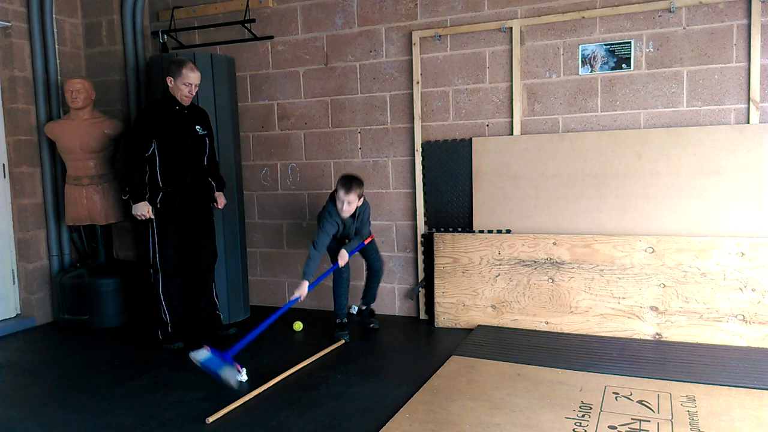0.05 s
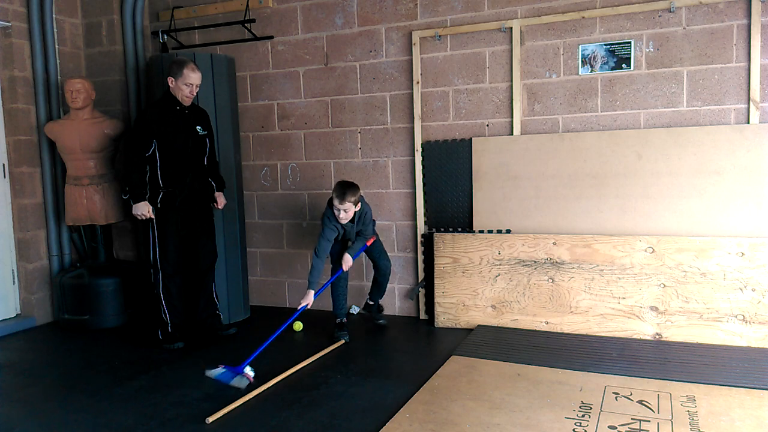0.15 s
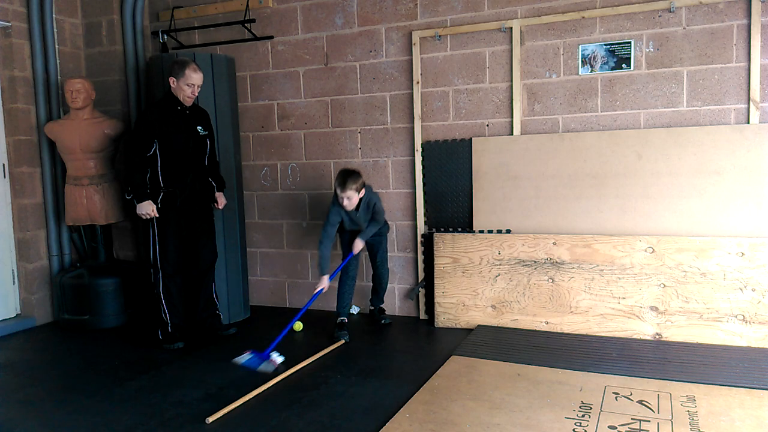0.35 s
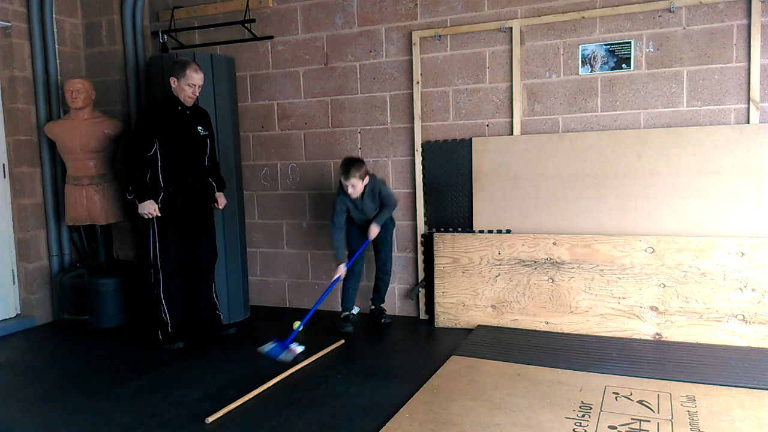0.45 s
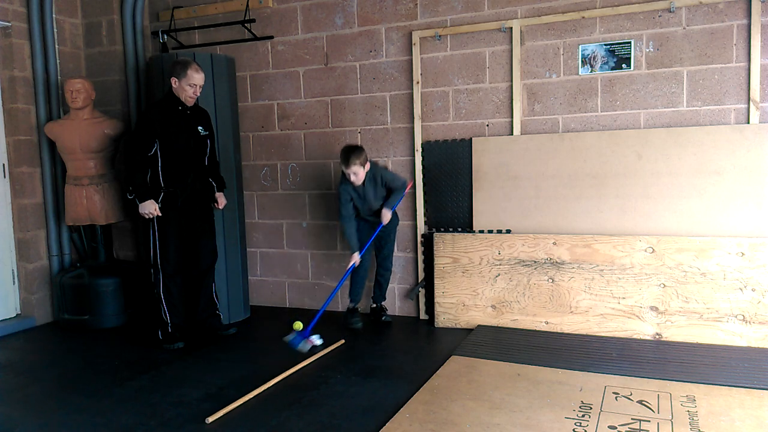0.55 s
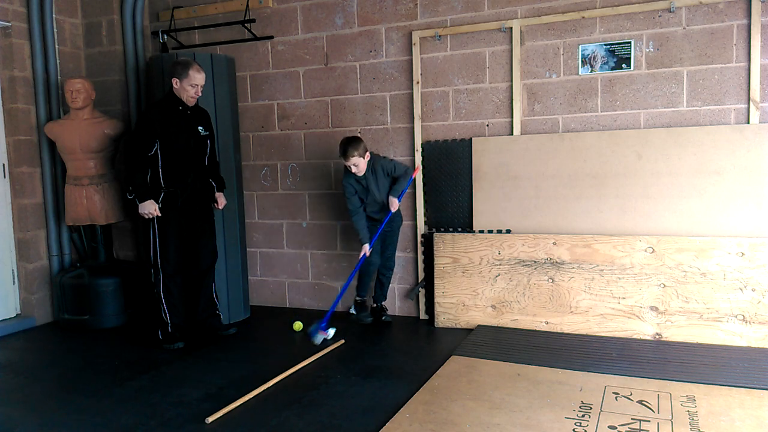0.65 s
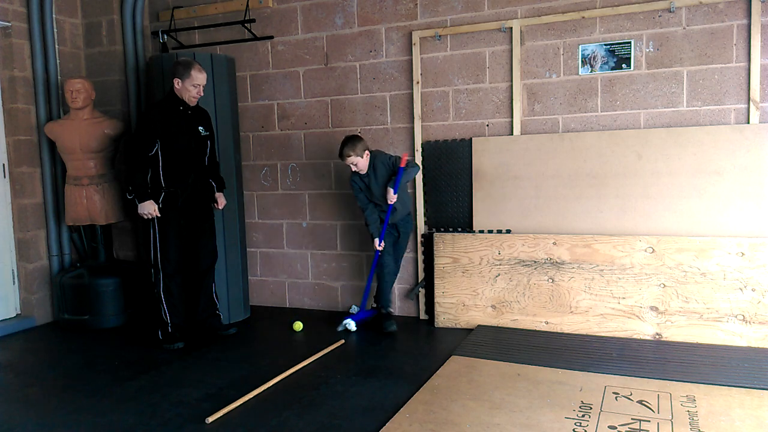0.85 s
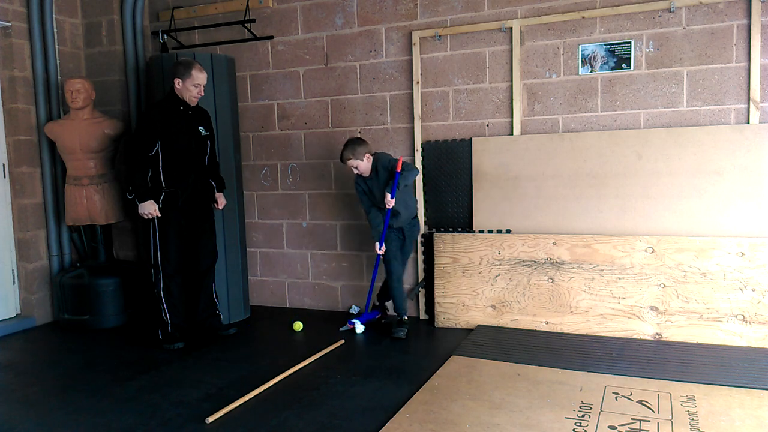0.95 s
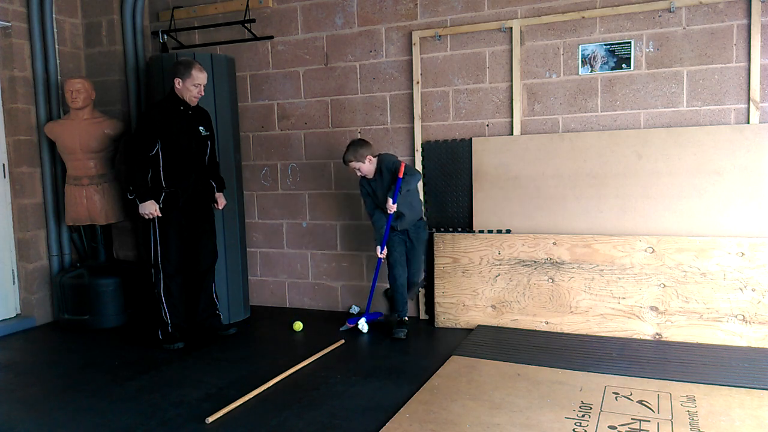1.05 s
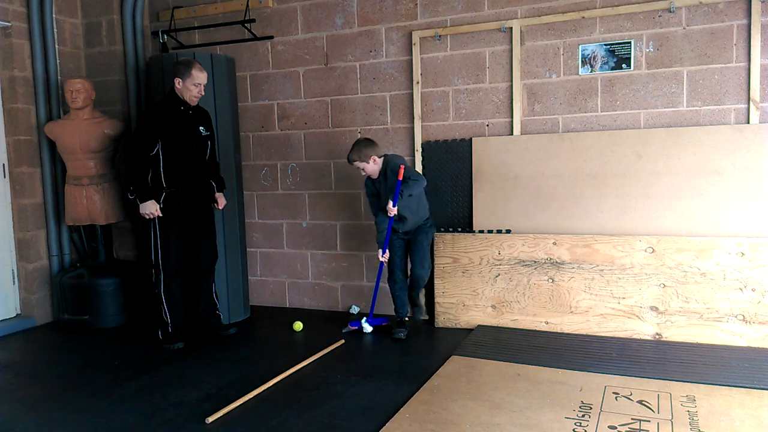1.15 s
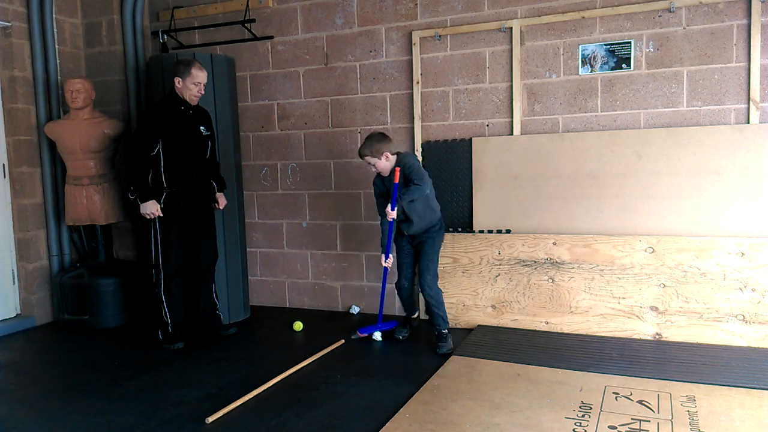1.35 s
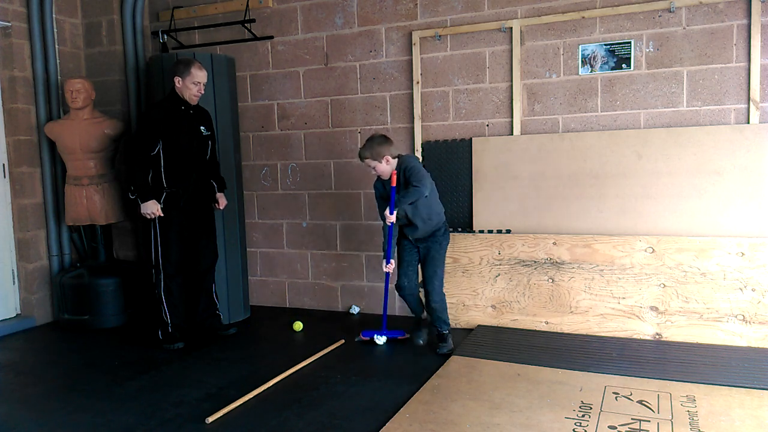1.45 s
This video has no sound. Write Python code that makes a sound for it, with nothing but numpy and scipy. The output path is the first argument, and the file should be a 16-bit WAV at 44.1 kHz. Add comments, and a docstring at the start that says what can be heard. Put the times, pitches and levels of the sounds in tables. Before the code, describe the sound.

A plastic broom clacks down twice, then its bristles scuff and swish over a rubber floor

```python
"""Sweeping a gym floor

A plastic broom lands on a rubber floor with a double clack: short noise bursts plus ringing tones.
Its bristles drag, scuff and swish (thousands of tiny random clicks) and push a scratchy scrap of paper.
Shoes thud softly and small ticks sound (short noise bursts); still air and a low rumble lie beneath.
The small block-walled room answers with one echo, a short fading tail and low ringing.
"""
import sys
import numpy as np
from scipy import signal
from scipy.fft import rfft, irfft, next_fast_len
from scipy.io import wavfile
from scipy.ndimage import uniform_filter1d

SR = 44100
rng = np.random.default_rng(int(sys.argv[2]) if len(sys.argv) > 2 else 0)


def put_to_file(sound):
    """Save the sound as 16-bit audio at rate SR, in the file named by the first command-line argument."""
    columns = np.atleast_2d(sound).T  # one column per channel
    safe = np.clip(columns, -1, 1)
    whole_steps = np.round(safe * 32767)
    wavfile.write(sys.argv[1], SR, whole_steps.astype(np.int16))


N = 66150  # samples: 1.5 s

# In the tables, t60 is the time [s] a sound takes to fade by 60 dB.

# the broom head lands, one end and then flat: (time [s], level [dB], bass [dB])
CLACKS = [(0.2057, -26, -4.5), (0.2364, -17.5, -0.5)]
# tones of the head and handle: (frequency [Hz], relative level [dB], t60 [s])
HEAD_MODES = [(420, 3, .18), (455, 0, .17), (531, -3, .13), (589, 2, .17), (714, -2, .13), (775, -1, .19),
              (932, -3, .22), (1108, -6, .2), (1161, -8, .12), (1335, -1, .16), (1433, -2, .19),
              (1466, -4, .16), (1583, -8, .15), (1637, -5, .18)]
# tone balance of the plastic clatter: (frequency [Hz], level [dB])
CLACK_COLOUR = [(100, -60), (190, -5), (300, 3), (600, 0.5), (1000, -3.5), (1500, -6), (1800, -0.5),
                (2050, -12.5), (3000, -9), (5200, -11.5), (6100, -21.5), (10500, -30), (15000, -54)]
# low room tones woken by clacks and steps: (frequency [Hz], relative level [dB], t60 [s])
BOOM_MODES = [(283, -1, .24), (312, -5, .2), (352, 1, .22), (421, 2, .2)]
CLACK_RISE_S, CLACK_T60_S = .0003, .057
RING_RISE_S, BOOM_RISE_S = .001, 0.0027
RING_DB, CLACK_BOOM_DB, CLACK_ROOM_DB = -13, -20, -13.5  # mix against the clatter
HEAD_LOW_HZ = 215  # the light head radiates no deep bass


def broom_head():
    """Each landing is a short plastic clatter that rings the head and handle and wakes the room."""
    out = np.zeros(N)
    for s, db, bass_db in CLACKS:
        envelope = strike(s, CLACK_RISE_S, CLACK_T60_S)
        clatter = burst(CLACK_COLOUR, envelope, bass_db=bass_db, modes=HEAD_MODES)
        ringing = amp(RING_DB) * ring(HEAD_MODES, s, RING_RISE_S)
        boom = amp(CLACK_BOOM_DB) * ring(BOOM_MODES, s, BOOM_RISE_S)
        # the tail shares the colour and resonances of the clatter
        tail = filtered(
            diffuse(s, count=N),
            lambda hz: unit(amp(along(CLACK_COLOUR, hz) + resonances(HEAD_MODES, hz))))
        tones = amp(bass_db) * (ringing + boom)
        out += amp(db) * (wall(clatter) + tones + amp(CLACK_ROOM_DB) * tail)
    low_cut = signal.butter(4, HEAD_LOW_HZ, "high", fs=SR, output="sos")
    return signal.sosfilt(low_cut, out)


# uneven drag of the bristles, swelling and fading: (time [s], level [dB])
DRAG = [(0, -61), (.19, -63), (.36, -62.5), (.48, -62.5), (.67, -57.5), (.83, -58), (.94, -66),
        (1.08, -66.5), (1.17, -79), (1.24, -73.5), (1.36, -59.5), (1.39, -51.5), (1.45, -55), (1.5, -60)]
# the bristles splay against the floor as the head lands: (time [s], level [dB])
SPLAY = [(.205, -94), (.21, -52), (.234, -35.5), (.245, -37.5), (.275, -38), (.31, -49.5), (.37, -58)]
# light swish of the bristle tips: (time [s], level [dB])
SWISH = [(0, -59.5), (.05, -53.5), (.12, -52.5), (.18, -68), (.3, -71), (.75, -60.5), (1.1, -72),
         (1.23, -53), (1.31, -57.5), (1.39, -52.5), (1.5, -61.5)]
# tone balance of the swish: (frequency [Hz], level [dB])
SWISH_COLOUR = [(300, -2), (800, 1.5), (2000, -16), (3800, -10), (4600, 4), (5200, 2), (6000, -10),
                (9000, -24), (15000, -27)]
# the bristles catch on the rubber:
# (time [s], length [s], level [dB], buzz against scuff [dB], buzz pitch [Hz])
SCUFFS = [(.390, 0.076, -49, -8, 1430), (0.499, 0.03, -51, -1, 1410), (0.548, 0.053, -52.5, 1.5, 1535),
          (0.583, 0.028, -55, 3, 1600), (0.601, 0.097, -51.5, -28, 1480), (.725, 0.034, -62, -11, 1520),
          (0.798, 0.049, -54, -13, 1640), (0.889, 0.037, -54.5, -1.5, 1550)]
# tone balance of scuffs, drag and splay: (frequency [Hz], level [dB])
SCUFF_COLOUR = [(200, -19), (700, -7), (1300, -1.5), (2500, 0), (3700, 1), (5200, -1), (6100, -10.5),
                (8000, -15.5), (11000, -24.5), (15000, -35)]


def bristles():
    """Bristles rubbing on rubber make an uneven drag and swish, with short buzzing scuffs."""
    drag = (level(DRAG) + level(SPLAY)) * flicks(SCUFF_COLOUR)
    swish = level(SWISH) * flicks(SWISH_COLOUR)
    out = drag + swish
    for s, length, db, buzz_db, pitch_hz in SCUFFS:
        scuff = flicks(SCUFF_COLOUR) + amp(buzz_db) * buzz(pitch_hz)
        out += amp(db) * press(s, length) * scuff
    return out


FLICKS_PER_S = 3800  # average number of bristle slips
FLICK_SPREAD_DB, FLUTTER_DB = 3.5, 0.96  # typical variation of single slips and of slower flutter


def flicks(colour):
    """Dense random slips of single bristles, fluttering in strength, rms 1."""
    happens = rng.random(N) < FLICKS_PER_S / SR
    direction = rng.choice([-1, 1], N)
    size = amp(FLICK_SPREAD_DB * rng.standard_normal(N))
    flutter = unit(uniform_filter1d(rng.standard_normal(N), size=400))  # smoothed over 9 ms
    slips = happens * direction * size * amp(FLUTTER_DB * flutter)
    return unit(filtered(slips, lambda hz: amp(along(colour, hz))))


BUZZ_WIDTH_HZ, BUZZ_THIRD_DB = 165, -8  # spread of the squeak, level of its third harmonic


def buzz(pitch_hz):
    """Rough squeak of bristles sticking and slipping: noise around a pitch and its third harmonic, rms 1."""
    def hump(hz, centre):
        return np.exp(-((hz - centre) / BUZZ_WIDTH_HZ) ** 2)

    def response(hz):
        return hump(hz, pitch_hz) + amp(BUZZ_THIRD_DB) * hump(hz, 3 * pitch_hz)

    return unit(filtered(rng.standard_normal(N), response))


SCUFF_RISE_S, SCUFF_FALL_S = 0.0084, 0.011  # straight rise, time constant of the release


def press(s, length):
    """Pressure of a short rub: a quick rise, and a release that starts halfway through its length."""
    rise = np.minimum(since(s) / SCUFF_RISE_S, 1)
    release = np.exp(-since(s + length / 2) / SCUFF_FALL_S)
    return rise * release


# the paper scratches along: (time [s], length [s], level [dB])
RUSTLES = [(0.378, 0.042, -62.5), (0.622, 0.05, -63), (0.767, 0.027, -55), (0.873, 0.068, -59.5),
           (0.99, .005, -57)]
# tone balance of the thin paper: (frequency [Hz], level [dB])
PAPER_COLOUR = [(1500, -12), (4000, 2), (6000, 0), (7500, 4), (9000, -11), (11500, -8), (15000, -35)]


def paper():
    """Rubs of the pushed scrap shape dense tiny slips into thin bright scratches."""
    strength = sum(amp(db) * press(s, length) for s, length, db in RUSTLES)
    return strength * flicks(PAPER_COLOUR)


# heel and sole contacts:
# (time [s], level [dB], t60 [s], treble [dB], room boom against thud [dB])
STEPS = [(0.0531, -37.5, 0.042, 20, -11.5), (.072, -48, .08, -19, 0), (.446, -47, 0.036, -2, -12),
         (1.027, -46, 0.073, 5.5, -23), (1.0445, -42, 0.15, 2, -10.5), (1.127, -47, 0.088, 19, -19),
         (1.378, -49, 0.29, 5, -21), (1.415, -54.5, 0.45, 2, -13)]
# tone balance of the thuds: (frequency [Hz], level [dB])
STEP_COLOUR = [(80, -31), (190, -16), (290, 8), (420, -4.5), (600, -2.5), (950, -7), (1800, -20),
               (4000, -37), (12000, -68)]
STEP_RISE_S, STEP_ROOM_DB = 0.00092, -9


def shoes():
    """Dull thuds on the rubber, brighter where a heel strikes, each with a short room boom."""
    out = np.zeros(N)
    for s, db, t60, treble_db, boom_db in STEPS:
        thud = burst(STEP_COLOUR, strike(s, STEP_RISE_S, t60), treble_db=treble_db)
        echoing_thud = room(thud, STEP_ROOM_DB)
        boom = amp(boom_db) * ring(BOOM_MODES, s, BOOM_RISE_S)
        out += amp(db) * (echoing_thud + boom)
    return out


# light ticks of broom and paper: (time [s], level [dB])
TICKS = [(.806, -58), (.9795, -41), (.9862, -41.5), (1.016, -46), (1.049, -50), (1.344, -47.5),
         (1.376, -44), (1.388, -47.5)]
# tone balance of the ticks: (frequency [Hz], level [dB])
TICK_COLOUR = [(300, -18), (900, -7), (1250, 3), (1700, 3.5), (2200, -14), (3400, -3), (5200, -4.5),
               (6300, -18), (11000, -28), (15000, -32)]
TICK_RISE_S, TICK_T60_S = .0004, 0.031


def ticks():
    """Small contacts of broom and paper, each a quickly fading noise burst."""
    out = np.zeros(N)
    for s, db in TICKS:
        out += amp(db) * burst(TICK_COLOUR, strike(s, TICK_RISE_S, TICK_T60_S))
    return out


# tone balance of the still room air: (frequency [Hz], level [dB])
AIR_COLOUR = [(20, 20.5), (50, -37), (90, -9.5), (180, -7.5), (400, -12), (900, -20.5), (2000, -52),
              (5000, -45), (7000, -20), (15000, -30.5)]
AIR_DB = -53
# loudness of the low rumble: (time [s], level [dB])
RUMBLE = [(0, -66), (.37, -66), (.42, -59), (.47, -66), (.7, -64), (1.11, -66), (1.16, -58), (1.22, -67),
          (1.36, -59), (1.5, -59)]
# tone balance of the rumble: (frequency [Hz], level [dB])
RUMBLE_COLOUR = [(12, -4.5), (25, -19), (52, -5), (90, -16.5), (250, -44)]


def background():
    """Steady noise of the room air and a faint uneven rumble."""
    air = amp(AIR_DB) * noise(AIR_COLOUR)
    rumble = level(RUMBLE) * noise(RUMBLE_COLOUR)
    return air + rumble


def room(x, wet_db):
    """Add the wall's echo and a short diffuse tail."""
    tail = diffuse(0, count=SR // 2)
    tail = tail / np.linalg.norm(tail)
    return wall(x) + amp(wet_db) * signal.fftconvolve(x, tail)[:N]


WALL_S, WALL_DB = .029, -15  # delay and level of the echo


def wall(x):
    """Add one wall's echo, a delayed quieter copy."""
    echo = np.interp(since(0) - WALL_S, since(0), x, left=0)
    return x + amp(WALL_DB) * echo


# fading time of the room: (frequency [Hz], t60 [s])
ROOM_T60 = [(200, 0.22), (1000, 0.59), (4000, 0.27), (11000, 0.25)]
ROOM_GAP_S = .005  # time constant of the tail's build-up


def diffuse(s, count):
    """Noise that starts at a moment and dies band by band as the room does."""
    hz, t, bands = signal.stft(rng.standard_normal(count), SR, nperseg=256)
    t60 = along(ROOM_T60, hz)[:, None]
    fade = np.exp(-np.log(1000) * np.maximum(t - s, 0) / t60)
    tail = signal.istft(bands * fade, SR)[1]
    return tail[:count] * (1 - np.exp(-since(s)[:count] / ROOM_GAP_S))


def burst(colour, envelope, treble_db=0, bass_db=0, modes=(), corner_hz=750):
    """Contact noise through a body's colour and resonances, shelved around a corner."""
    m = next_fast_len(2 * N)
    hz = np.fft.rfftfreq(m, 1 / SR)
    low = 1 / (1 + (hz / corner_hz) ** 4)  # 1 in the bass, 0 in the treble
    shelves = bass_db * low + treble_db * (1 - low)
    gain = unit(amp(along(colour, hz) + shelves + resonances(modes, hz)))
    # minimum phase: the body answers after each contact, never before it
    cepstrum = irfft(np.log(gain), m)
    cepstrum[1:m // 2] *= 2
    cepstrum[m // 2 + 1:] = 0
    body = np.exp(rfft(cepstrum))
    contact = rng.standard_normal(N) * envelope
    return irfft(rfft(contact, m) * body, m)[:N]


RESONANCE_DB, RESONANCE_WIDTH_HZ = 7, 26


def resonances(modes, hz):
    """Lift in dB around each mode of a body."""
    humps = sum(np.exp(-((hz - mode[0]) / RESONANCE_WIDTH_HZ) ** 2) for mode in modes)
    return RESONANCE_DB * np.minimum(humps, 1)


def ring(modes, s, rise):
    """Damped modes set going at a moment, a little different every time."""
    out = np.zeros(N)
    for hz, db, t60 in modes:
        gain = amp(db + rng.normal(0, 1))
        tone = np.sin(2 * np.pi * (hz * since(s) + rng.random()))
        out += gain * tone * strike(s, rise, t60)
    return out


def strike(s, rise, t60):
    """Quick rise (time constant in s) and exponential decay."""
    t = since(s)
    return (1 - np.exp(-t / rise)) * np.exp(-np.log(1000) * t / t60)


def noise(colour):
    """Coloured noise of rms 1."""
    return unit(filtered(rng.standard_normal(N), lambda hz: amp(along(colour, hz))))


def filtered(x, response):
    """Shape x by a gain that depends on frequency."""
    m = next_fast_len(N + 8192)
    return irfft(rfft(x, m) * response(np.fft.rfftfreq(m, 1 / SR)), m)[:N]


def level(rows):
    """Gain per sample from (time [s], level [dB]) points."""
    return amp(np.interp(since(0), *np.transpose(rows)))


def along(points, hz):
    """Read (frequency [Hz], value) points on a log axis."""
    f, v = np.transpose(points)
    return np.interp(np.log(hz + 1), np.log(f + 1), v)


def since(s):
    """Seconds since a moment, zero before it."""
    return np.maximum(np.arange(N) / SR - s, 0)


def amp(db):
    """Decibels to gain."""
    return 10 ** (np.asarray(db) / 20)


def unit(x):
    """Scale to rms 1."""
    return x / np.sqrt(np.mean(x ** 2) + 1e-20)


BRUSH_ROOM_DB = -19  # room tail of bristles, paper and ticks


def scene():
    """Broom, paper and shoes in the gym."""
    landing = broom_head()
    steps = shoes()
    brushing = room(bristles() + paper() + ticks(), BRUSH_ROOM_DB)
    return (landing + brushing + steps + background())[None]


TOP_HZ = 15750


def record(dry):
    """Keep nothing above the recorder's band limit."""
    return filtered(dry[0], lambda hz: hz < TOP_HZ)[None]


dry = scene()
out = record(dry)
put_to_file(out)
```